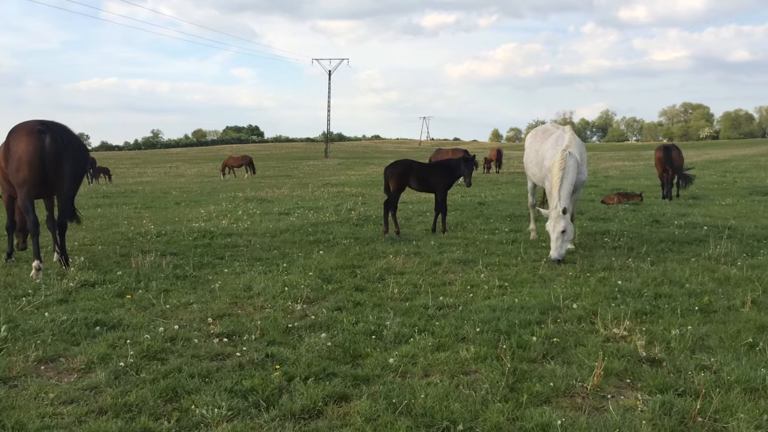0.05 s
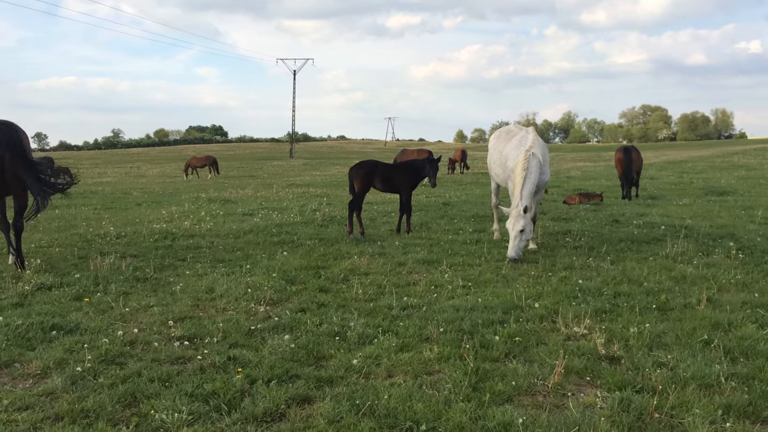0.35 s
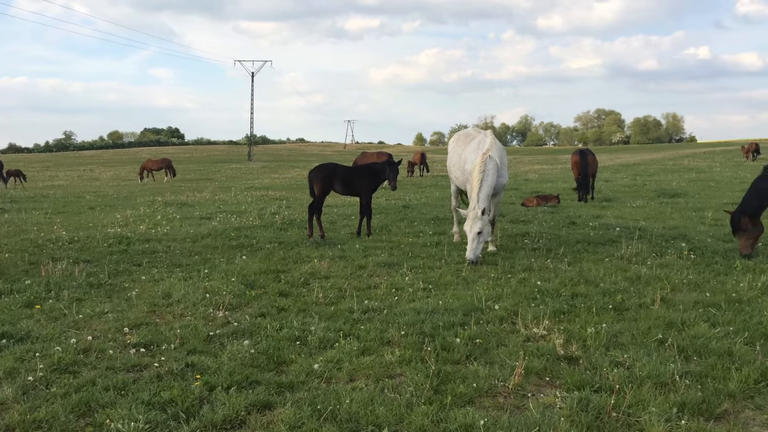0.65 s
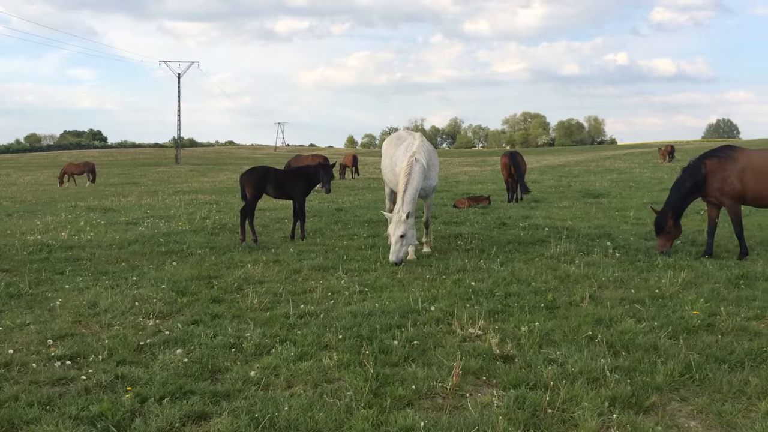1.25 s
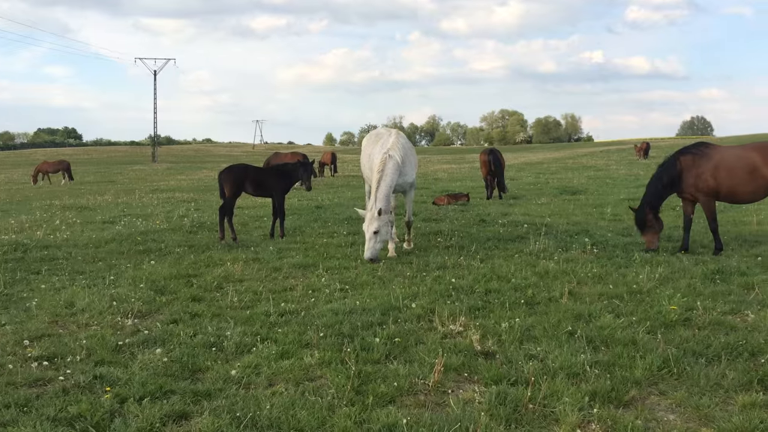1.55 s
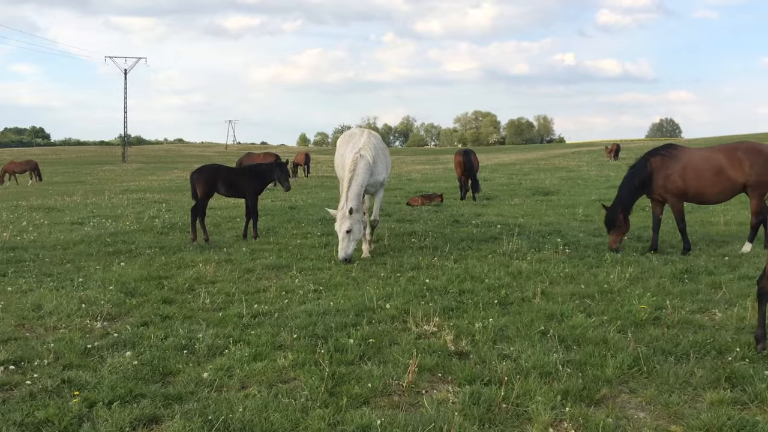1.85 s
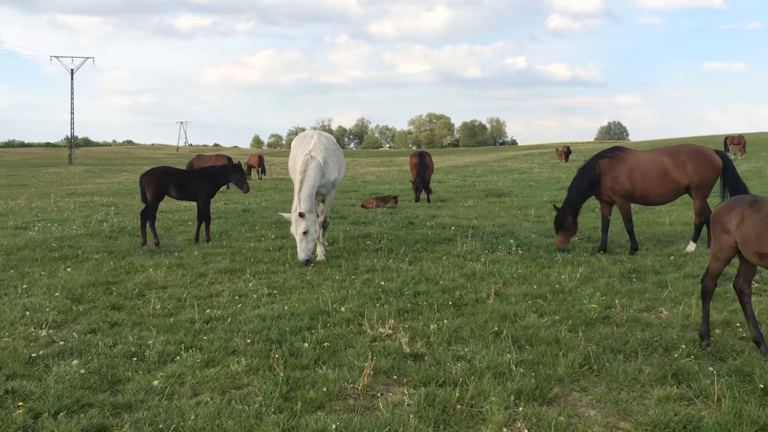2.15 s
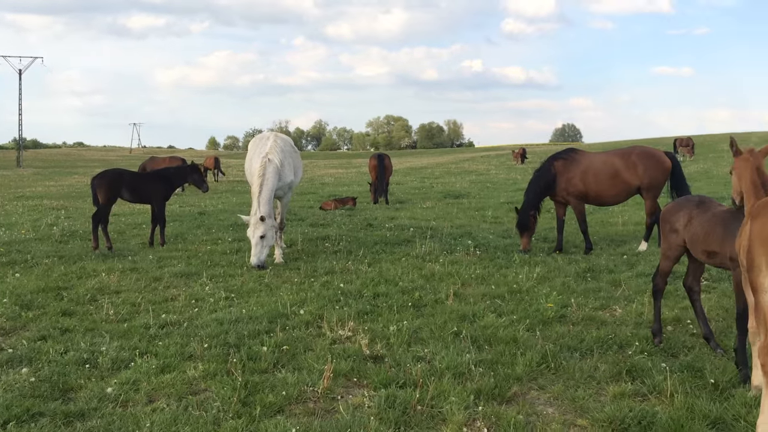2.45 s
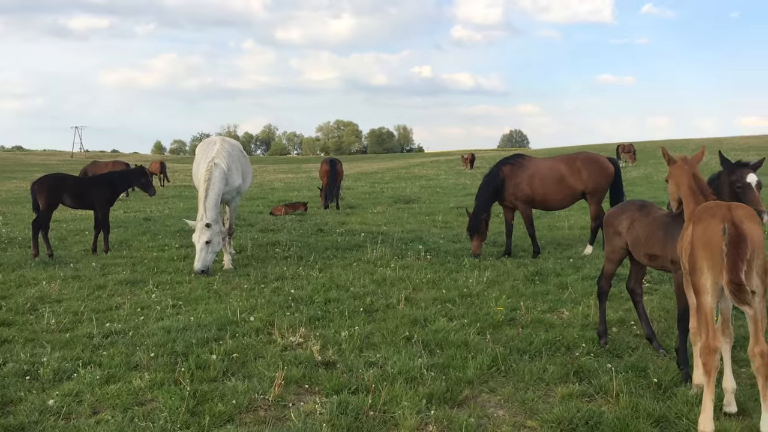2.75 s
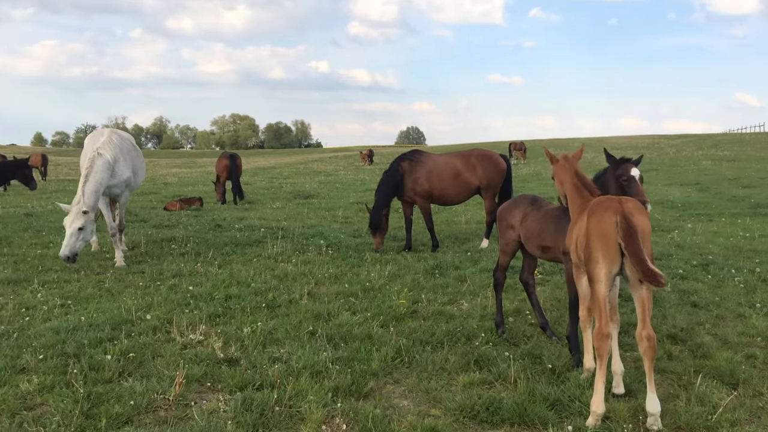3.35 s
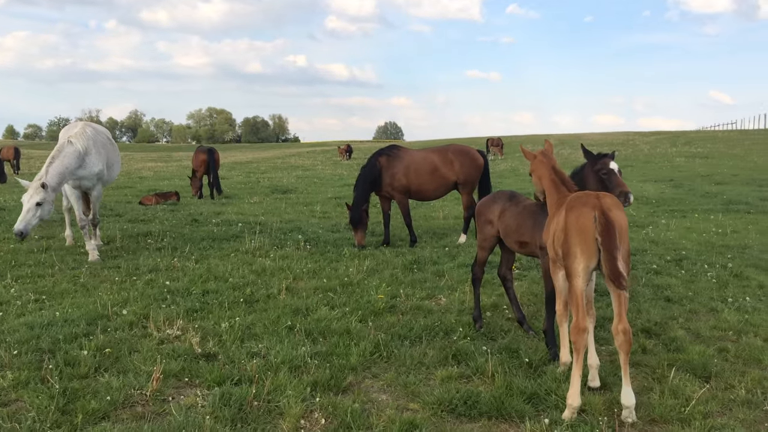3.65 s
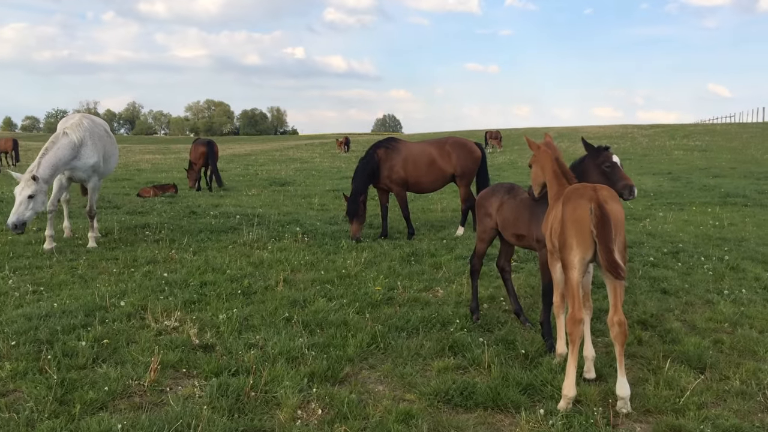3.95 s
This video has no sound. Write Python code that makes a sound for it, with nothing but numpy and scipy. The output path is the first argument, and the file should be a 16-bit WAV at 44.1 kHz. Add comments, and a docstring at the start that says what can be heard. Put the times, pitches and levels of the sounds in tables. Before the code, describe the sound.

A horse whinnies twice in an open pasture, high, wavering and slightly hoarse. Before the calls, wind rumbles and thumps on the microphone, then eases. A lark warbles faintly throughout over softly rustling grass.

```python
"""A horse whinnies twice in a pasture: a high wavering whistle, roughened by a second, lower voice,
shaped by the throat and echoed by far trees. Each call starts with a grunt and ends in a falling groan.
Wind rumbles and its eddies thump on the microphone. Overhead a lark sings one warbled phrase three
times, with a trill and a held note. Grass rustles, dry stalks snap, the camera takes soft bumps."""
import sys
import numpy as np
from scipy import signal
from scipy.fft import rfft, irfft, next_fast_len
from scipy.io import wavfile
from scipy.ndimage import uniform_filter1d, map_coordinates

SR = 44100
rng = np.random.default_rng(int(sys.argv[2]) if len(sys.argv) > 2 else 0)


def transcribe(signal):
    """Save signal, clipped to [-1, 1], as a 16-bit WAV file at the path in sys.argv[1]."""
    frames = np.atleast_2d(signal).T
    limited = np.clip(frames, -1, 1)
    pcm = np.round(limited * 32767).astype(np.int16)
    wavfile.write(sys.argv[1], SR, pcm)


N = 176400

# per whinny, crest by crest (time [s], whistle pitch [Hz], body level [dB], treble level [dB])
WHINNY_CONTOURS = [
    [(2.33, 800, -62, -77), (2.385, 986, -62, -58.5), (2.41, 1200, -49, -44), (2.448, 1440, -47, -38.5),
     (2.49, 1525, -40, -39.5), (2.538, 1458, -54.5, -41.5), (2.572, 1497, -46.5, -41.5),
     (2.615, 1458, -50.5, -44.5), (2.66, 1488, -45.5, -43), (2.705, 1485, -51, -42.5),
     (2.765, 1609, -43.5, -40), (2.82, 1440, -53.5, -50), (2.862, 1534, -46, -50.5),
     (2.92, 1396, -60.5, -51.5), (2.99, 1585, -46, -47.5), (3.025, 1522, -44, -47.5),
     (3.065, 964, -69, -73)],
    [(3.21, 987, -57, -75), (3.255, 1224, -48, -60.5), (3.292, 1461, -46, -47.5), (3.322, 1387, -52, -48.5),
     (3.382, 1518, -46, -43.5), (3.425, 1395, -58.5, -45), (3.478, 1515, -46, -46),
     (3.535, 1370, -59, -49.5), (3.59, 1474, -44.5, -48.5), (3.628, 1413, -49.5, -47),
     (3.688, 1590, -36, -54), (3.72, 1430, -45.5, -46.5), (3.75, 1260, -48.5, -47.5),
     (3.788, 1420, -51.5, -49), (3.838, 1639, -37.5, -51), (3.875, 1344, -47, -50), (3.915, 827, -64, -70)],
]
# hoarseness at the usual pitch (time [s], share [0-1])
HOARSENESS = [(2.37, .9), (2.435, .4), (2.48, .66), (2.54, .41), (2.7, .42), (2.78, .55), (2.88, .38),
              (3.0, .66), (3.26, .75), (3.39, .58), (3.54, .47), (3.62, .74), (3.69, .45), (3.86, .55)]
# whistle harmonics 1-4 (relative level [dB])
HARMONICS_DB = [0, -2.5, -7, -19]
# low voice, then its sum tones with harmonics 1-3 (relative level [dB])
SIDEBANDS_DB = [3.5, 3, -0.5, -6]
# throat resonances (frequency [Hz], gain [dB])
THROAT_EQ = [(300, -23.5), (720, -13.5), (1050, -13.5), (1550, 3), (1880, -1), (2280, 5), (2520, 1.5),
             (2760, 3.5), (3120, -11.5), (3550, 4.5), (3950, -3), (4400, 3), (4750, -11.5), (5100, -6),
             (6200, -14), (8000, -20), (14000, -50)]
# piercing resonance of the wide-open mouth (time [s], gain [dB])
MOUTH_GAIN = [(2.4, -3), (2.48, 1), (2.78, -1), (2.95, -33)]
# voice starting up (time [s], length [s], pulse rate [Hz], level [dB])
GRUNT_EVENTS = [(2.339, 0.0636, 128, -41.5), (3.204, 0.055, 132.4, -43)]
# chest resonance (frequency [Hz], gain [dB])
CHEST_EQ = [(60, -25), (130, 2), (260, 5.5), (450, -23), (1500, -42)]
# voice gathering or collapsing (time [s], length [s], start [Hz], middle [Hz], end [Hz], level [dB])
GROAN_NOTES = [(2.365, 0.058, 650, 853, 1210, -51.5), (3.03, 0.041, 1000, 753, 604, -55),
               (3.885, 0.0337, 966, 752, 610, -52)]
# wind rumble (time [s], relative level [dB])
WIND_LEVEL = [(0, -35), (.68, -37), (.8, -41.5), (1.15, -36), (1.45, -49), (1.7, -48), (2.1, -56),
              (2.5, -49), (3.35, -50), (3.75, -49), (4, -49)]
# eddies on the microphone (time [s], relative level [dB], slap offset [dB], decay [s])
EDDY_HITS = [(0.02, -8.5, -40, 0.0088), (0.093, -9.5, -22.5, 0.023), (0.129, -14.5, -40, 0.02),
             (0.148, -17, -22, 0.022), (0.242, -19.5, -16.5, 0.028), (0.323, -9.5, -6, 0.015),
             (0.337, -4, -20, 0.013), (0.364, -8, -13.5, 0.015), (0.461, -12, -46, 0.016),
             (0.534, -18, -18, 0.019), (0.613, -19.5, -19, 0.041), (0.646, -22, -15.5, 0.036),
             (0.672, -16, -30, 0.021), (0.685, -14, -15.5, 0.016), (0.924, -20.5, -48, 0.0099),
             (1.043, -15, -29.5, 0.032), (1.084, -20.5, -35, 0.018), (1.788, -21.5, -30, 0.028),
             (3.504, -23.5, -43, 0.024), (3.621, -27, -39, 0.039), (3.718, -26, -37, 0.02)]
# wind spectra (frequency [Hz], gain [dB])
RUMBLE_EQ = [(20, -35), (40, -2), (68, 6.5), (120, -1), (220, -13.5), (400, -27.5), (1500, -62)]
THUD_EQ = [(25, -30), (70, 2), (150, 3), (280, -8), (420, -26.5), (1500, -86)]
SLAP_EQ = [(100, 0), (260, 2.5), (400, 7.5), (600, -10.5), (850, -23), (1500, -49), (4000, -91)]
# lark phrase, two-voiced trill (offset [s], length [s], start [Hz], middle [Hz], end [Hz], level [dB])
PHRASE_NOTES = [(0, .02, 5400, 5600, 5900, -68), (0.048, 0.038, 5600, 5100, 4000, -66),
                (0.12, 0.055, 5000, 5450, 5400, -66), (0.172, 0.05, 4550, 3550, 2650, -65),
                (0.247, .105, 4200, 4550, 4650, -59), (.335, .042, 4750, 4400, 4050, -59.5),
                (.408, 0.06, 4600, 5200, 5300, -64), (0.466, 0.042, 4650, 3750, 3500, -61),
                (0.508, 0.066, 3300, 2700, 2100, -65), (0.63, 0.075, 5600, 5450, 4900, -66),
                (0.692, .125, 4850, 4570, 4550, -63.5), (0.848, .032, 4850, 4800, 3600, -65),
                (0.883, 0.038, 3650, 3590, 3370, -63.5), (0.928, 0.041, 3550, 3510, 3100, -62.5),
                (0.973, 0.047, 3540, 3340, 3310, -61.5)]
TRILL_NOTES = [(0, .04, 4600, 4980, 4700, -63), (.024, .034, 4500, 3970, 4450, -63.5)]
# phrase onsets (time [s])
PHRASE_STARTS_S = [0, 1.405, 2.81]
# lark's held note (time [s], length [s], start [Hz], middle [Hz], end [Hz], level [dB])
HELD_NOTE = [(3.94, .08, 4200, 4200, 4170, -58)]
# stalk snaps, camera bumps (time [s], relative level [dB])
SNAP_HITS = [(1.1418, -43), (1.15, -40.5), (1.7556, -47)]
BUMP_HITS = [(0.590, -32.5), (1.264, -44), (1.449, -53)]
# snap, bump, grass and still-air spectra (frequency [Hz], gain [dB])
SNAP_EQ = [(300, -2), (1200, 2), (2800, -10), (5000, -10), (8000, -1), (11000, -3), (15000, -25)]
BUMP_EQ = [(150, -5), (1200, 0), (2300, -12), (4000, -30), (12000, -60)]
GRASS_EQ = [(200, 1), (700, 7), (4000, -1.5), (8500, -1.5), (15000, -4)]
AIR_EQ = [(150, 12.5), (400, 7), (3000, -4), (15000, -16)]
# grass hiss (time [s], relative level [dB])
RUSTLE_LEVEL = [(0, -78), (.26, -67), (.4, -75), (1.06, -79), (1.16, -69), (1.31, -64), (1.42, -75),
                (1.56, -69), (1.68, -74), (2.55, -70), (3.15, -73), (3.22, -64), (3.32, -70), (4, -74)]

USUAL_WHISTLE_HZ, LOW_VOICE_HZ, LOW_TRACKING = 1466, 721.4, 0.3502
WHISTLE_JITTER, LOW_JITTER, GROAN_JITTER, LARK_JITTER = .016, .0812, .14, .011  # shares of pitch
QUAVER_HZ, RASP_HZ, SMEAR_RAD, HOARSE_PER_OCTAVE = 130, 420, .4, .14
MOUTH_HZ, MOUTH_WIDTH_HZ, SPLIT_HZ = 3260, 350, 2495
EDDY_RISE_S, THUD_DB, SLAP_DB = .0025, -9, 1
WARBLE_HZ, BUZZ_ABOVE_HZ, TRILL_START_S, TRILL_STEP_S = 52, 4500, 1.127, .0435
ECHO_DB, HORSE_REVERB_DB, LARK_REVERB_DB = -18.5, -12.5, -8
AIR_DB, CUTOFF_HZ = -66.5, 15400


def horse():
    """Two whinnies, each swelling out of a grunt and collapsing into a groan."""
    out = sweeps(GROAN_NOTES, jitter=GROAN_JITTER)
    for contour in WHINNY_CONTOURS:
        add(out, contour[0][0], whinny(contour))
    for start_s, length_s, pulse_hz, db in GRUNT_EVENTS:
        add(out, start_s, amp(db) * grunt(length_s, pulse_hz))
    return out


def whinny(contour):
    """Voice through throat and mouth; body and treble follow separate level curves."""
    t = np.arange(contour[0][0], contour[-1][0], 1 / SR)
    pitch_hz, body_db, treble_db = glide(contour, t)
    strain_octaves = np.maximum(np.log2(pitch_hz / USUAL_WHISTLE_HZ), 0)
    hoarse = np.clip(curve(HOARSENESS, t) + HOARSE_PER_OCTAVE * strain_octaves, 0, 1)
    source = larynx(pitch_hz, hoarse)
    mouth = filtered(source, lambda hz: np.exp(-((hz - MOUTH_HZ) / MOUTH_WIDTH_HZ) ** 2))
    voice = colour(source, THROAT_EQ) + amp(curve(MOUTH_GAIN, t)) * mouth
    body = filtered(voice, lambda hz: 1 / (1 + (hz / SPLIT_HZ) ** 20))
    call = amp(body_db) * steady(body) + amp(treble_db) * steady(voice - body)
    return call * signal.windows.tukey(len(t), .03)


def larynx(pitch_hz, hoarse):
    """A whistle modulated by an unsteady low voice; hoarseness fades in sidebands and rasp."""
    n = len(pitch_hz)
    whistle_rad = cycle(pitch_hz * (1 + WHISTLE_JITTER * hoarse * wobble(QUAVER_HZ, n)))
    low_hz = LOW_VOICE_HZ * (pitch_hz / USUAL_WHISTLE_HZ) ** LOW_TRACKING
    low_rad = cycle(low_hz * (1 + LOW_JITTER * wobble(RASP_HZ, n)))
    harmonics = list(enumerate(HARMONICS_DB, 1))
    sidebands = [(k * whistle_rad + low_rad, db) for k, db in enumerate(SIDEBANDS_DB)]

    def flutter(db):
        return amp(db + 3 * wobble(QUAVER_HZ, n))

    def noise_skirt(phase):
        spread = wobble(2 * RASP_HZ, n) + 1j * wobble(2 * RASP_HZ, n)
        return np.real(spread * np.exp(1j * phase))

    whistle = sum(flutter(db) * np.sin(k * (whistle_rad + SMEAR_RAD * hoarse * wobble(RASP_HZ, n)))
                  for k, db in harmonics)
    growl = sum(flutter(db) * np.sin(phase + wobble(QUAVER_HZ, n)) for phase, db in sidebands)
    rasp = sum(amp(db) * noise_skirt(k * whistle_rad) for k, db in harmonics)
    rasp += sum(amp(db) * noise_skirt(phase) for phase, db in sidebands)
    hiss = amp(-4.5) * rng.standard_normal(n)
    rough = amp(-2.5) * unit(growl) + amp(-3) * (unit(rasp) + hiss)
    return (1 - hoarse) * unit(whistle) + hoarse * rough


def grunt(length_s, pulse_hz):
    """Uneven, swelling pulses through the chest resonance."""
    n = int(length_s * SR)
    phase = cycle(pulse_hz * (1 + GROAN_JITTER * wobble(149, n)))
    pulses = np.diff(phase // (2 * np.pi), prepend=0)
    swell = np.linspace(.2, 1, n) * signal.windows.tukey(n, .4)
    return unit(colour(pulses, CHEST_EQ) * swell)


def sweeps(notes, jitter, warble=0):
    """Flickering tones arching through three pitches; warble flicks them down, high ones buzz."""
    out = np.zeros(N)
    for start_s, length_s, first_hz, middle_hz, last_hz, db in notes:
        n = int(length_s * SR)
        progress = np.linspace(0, 1, n)
        arch_hz = (middle_hz - (first_hz + last_hz) / 2) * np.sin(np.pi * progress)
        hz = first_hz + (last_hz - first_hz) * progress + arch_hz
        flick = np.sin(cycle(np.full(n, WARBLE_HZ)) / 2) ** 20
        buzz = jitter * max(middle_hz / BUZZ_ABOVE_HZ, 1) ** 9
        hz *= 1 - warble * (flick - flick.mean()) + buzz * wobble(445, n)
        envelope = amp(db + 3.5 * wobble(140, n)) * signal.windows.tukey(n, .5)
        add(out, start_s, envelope * np.sin(cycle(hz)))
    return out


def wind():
    """Lumpy rumble, plus single eddies that thud and slap on the microphone."""
    level_db = curve(WIND_LEVEL, np.arange(N) / SR) - .5
    lumps_db = 4.5 * wobble(25.154, N)
    out = amp(level_db + lumps_db) * steady(noise(RUMBLE_EQ, N), window_samples=3000)
    thud = steady(noise(THUD_EQ, N), window_samples=600)
    slap = steady(noise(SLAP_EQ, N))
    t = np.arange(SR // 8) / SR
    rise = np.minimum(t / EDDY_RISE_S, 1) ** 2
    for time_s, db, slap_offset_db, decay_s in EDDY_HITS:
        envelope = np.zeros(N)
        add(envelope, time_s - EDDY_RISE_S / 2, rise * np.exp(-(t / decay_s) ** 2))
        out += amp(db + THUD_DB) * envelope * thud
        out += amp(db + SLAP_DB + slap_offset_db) * envelope ** 2 * slap
    return out * signal.windows.tukey(N, .004)


def lark():
    """One warbled phrase repeated, a two-voiced trill and a held note."""
    phrases = [(start_s + s, *note) for start_s in PHRASE_STARTS_S for s, *note in PHRASE_NOTES]
    trill = [(TRILL_START_S + k * TRILL_STEP_S + s, *note) for k in range(4) for s, *note in TRILL_NOTES]
    return sweeps(phrases, LARK_JITTER, warble=.08) + sweeps(trill + HELD_NOTE, LARK_JITTER / 2)


def contacts(hits, eq, t60_s, gain_db):
    """Brief contacts that do not ring: decaying noise bursts."""
    out = np.zeros(N)
    t = np.arange(SR // 10) / SR
    rise = np.minimum(10 * t / t60_s, 1)
    for time_s, db in hits:
        add(out, time_s, amp(db + gain_db - 60 * t / t60_s) * rise * noise(eq, len(t)))
    return out


def grass():
    """Rustle: a grainy hiss that comes and goes."""
    level_db = curve(RUSTLE_LEVEL, np.arange(N) / SR) + 4
    grain_db = wobble(30.16, N) + 2.2 * wobble(440, N)
    return amp(level_db + grain_db) * noise(GRASS_EQ, N)


def still_air():
    """Faint, steady, dark noise."""
    return amp(AIR_DB) * noise(AIR_EQ, N)


def reflection(x, delay_s, t60_s):
    """Diffuse reflection: arrives late, dies away."""
    t = np.arange(SR // 2) / SR
    tail = rng.standard_normal(len(t)) * amp(-60 * t / t60_s)
    out = np.zeros(N)
    add(out, delay_s, signal.fftconvolve(x, tail / np.linalg.norm(tail)))
    return out


def amp(db):
    """Decibels to gain."""
    return 10 ** (np.asarray(db) / 20)


def unit(x):
    """Scale to rms 1."""
    return x / np.sqrt(np.mean(x ** 2) + 1e-20)


def steady(x, window_samples=400):
    """Hold the running rms at 1."""
    return x / np.sqrt(np.abs(uniform_filter1d(x * x, window_samples)) + 1e-12)


def curve(rows, t):
    """Linear interpolation of (time, value) rows."""
    return np.interp(t, *np.transpose(rows))


def glide(rows, t):
    """Spline through each column after the time."""
    times_s, *columns = np.transpose(rows)
    position = np.interp(t, times_s, np.arange(len(times_s)))
    return [map_coordinates(column, [position], mode="nearest") for column in columns]


def wobble(rate_hz, n):
    """Smooth random curve, rate_hz knots a second."""
    knots = rng.standard_normal(int(n * rate_hz / SR) + 4)
    return map_coordinates(knots, [np.arange(n) * rate_hz / SR])


def filtered(x, response):
    """Apply a gain given as a function of frequency."""
    size = next_fast_len(len(x) + 4096)
    return irfft(rfft(x, size) * response(np.fft.rfftfreq(size, 1 / SR)), size)[:len(x)]


def colour(x, eq):
    """Filter by (frequency [Hz], gain [dB]) points."""
    points_hz, db = np.transpose(eq)
    return filtered(x, lambda hz: amp(np.interp(np.log(hz + 1), np.log(points_hz), db)))


def noise(eq, n):
    """Coloured noise, rms 1."""
    return unit(colour(rng.standard_normal(n), eq))


def cycle(hz):
    """Running phase [rad] of a pitch curve."""
    return 2 * np.pi * np.cumsum(hz) / SR


def add(track, start_s, x):
    """Mix x into the track."""
    i = min(max(round(start_s * SR), 0), len(track))
    track[i:i + len(x)] += x[:len(track) - i]


def scene():
    """Horse and lark in the open field; wind and small noises close by."""
    call, song = horse(), lark()
    tree_echo = amp(ECHO_DB) * reflection(call, delay_s=.17, t60_s=.0063)
    send = amp(HORSE_REVERB_DB) * call + amp(LARK_REVERB_DB) * song
    field = reflection(send, delay_s=.0056, t60_s=.4)
    ambience = wind() + grass() + still_air()
    stalk_snaps = contacts(SNAP_HITS, SNAP_EQ, t60_s=.008, gain_db=3)
    camera_bumps = contacts(BUMP_HITS, BUMP_EQ, t60_s=.035, gain_db=1)
    return (call + song + tree_echo + field + ambience + stalk_snaps + camera_bumps)[None]


def record(dry):
    """Camera band limit: brick-wall low-pass."""
    return filtered(dry[0], lambda hz: hz < CUTOFF_HZ)[None]


dry = scene()
out = record(dry)
transcribe(out)
```